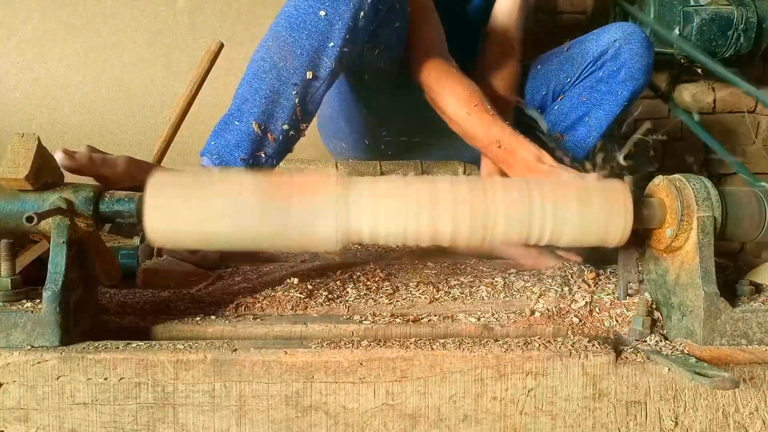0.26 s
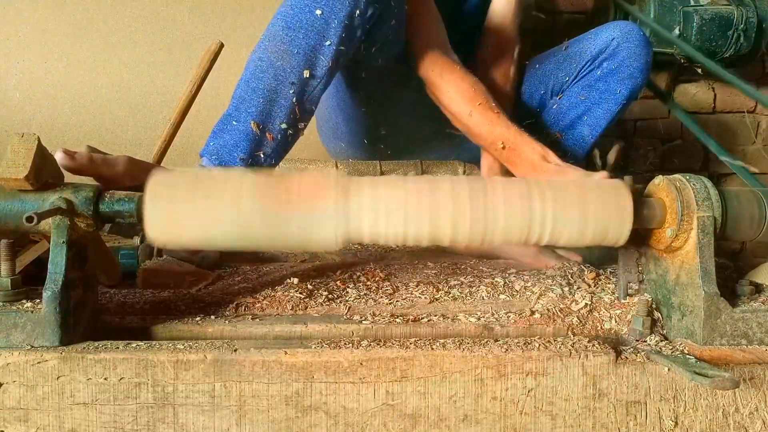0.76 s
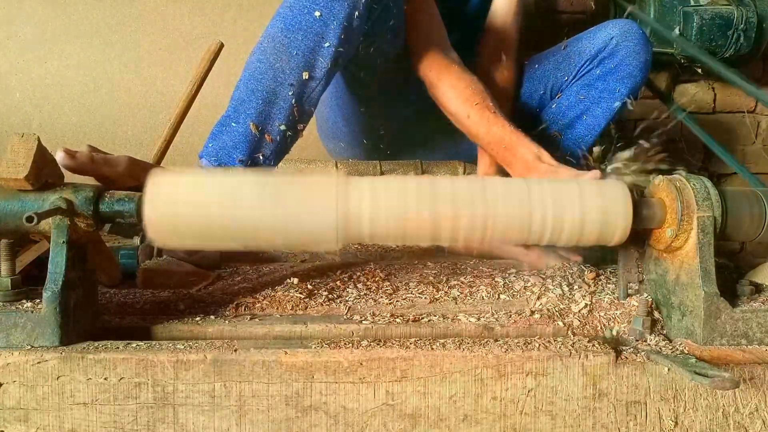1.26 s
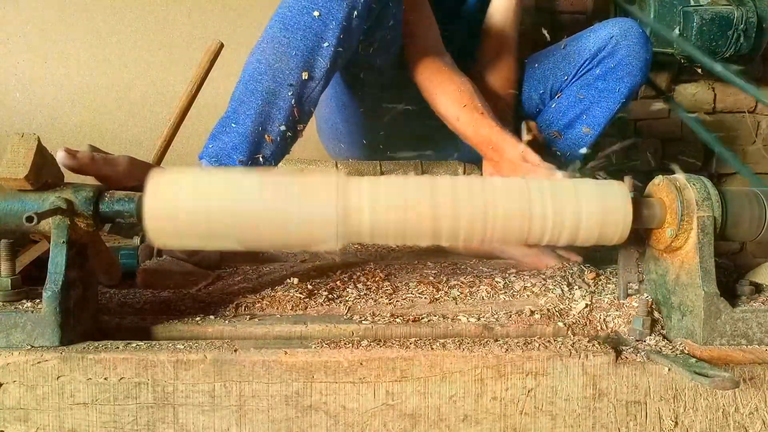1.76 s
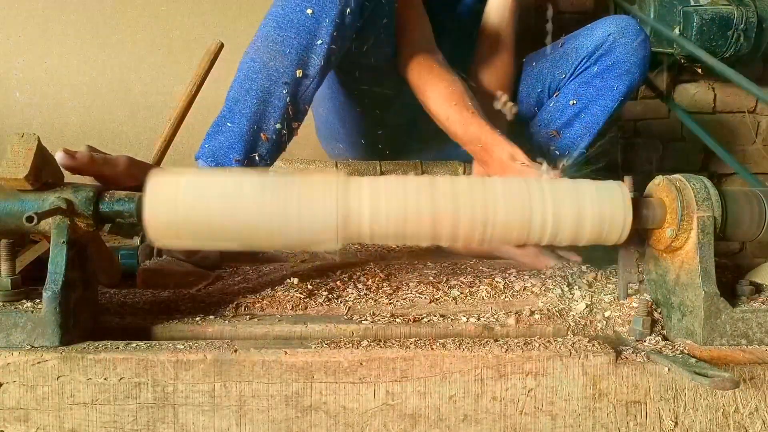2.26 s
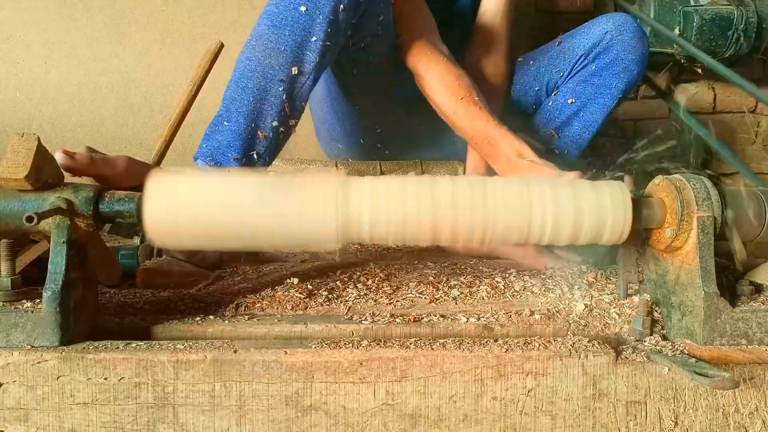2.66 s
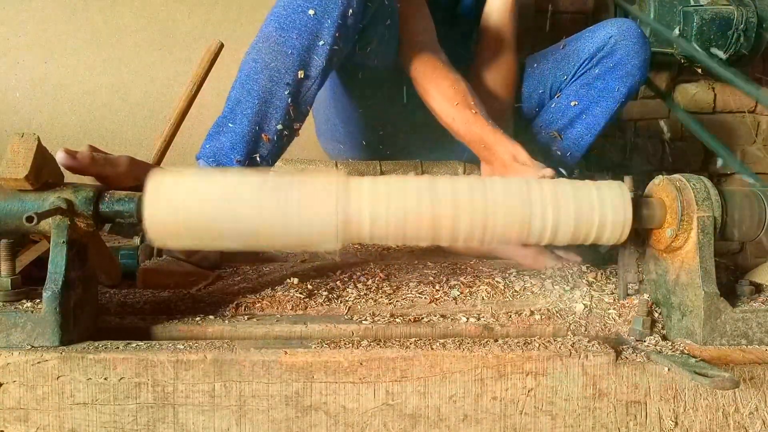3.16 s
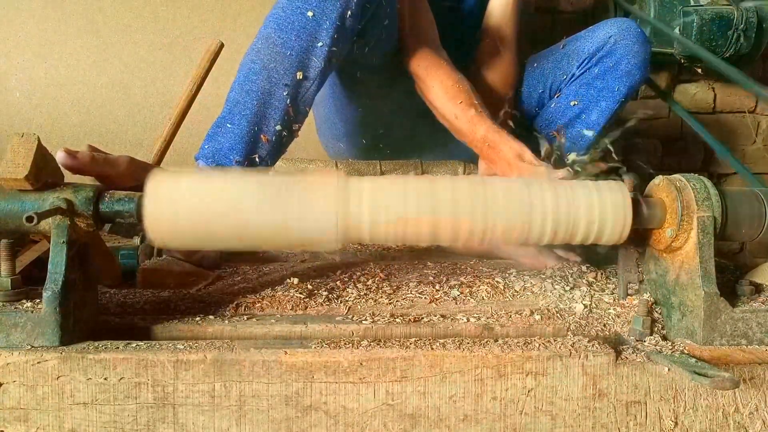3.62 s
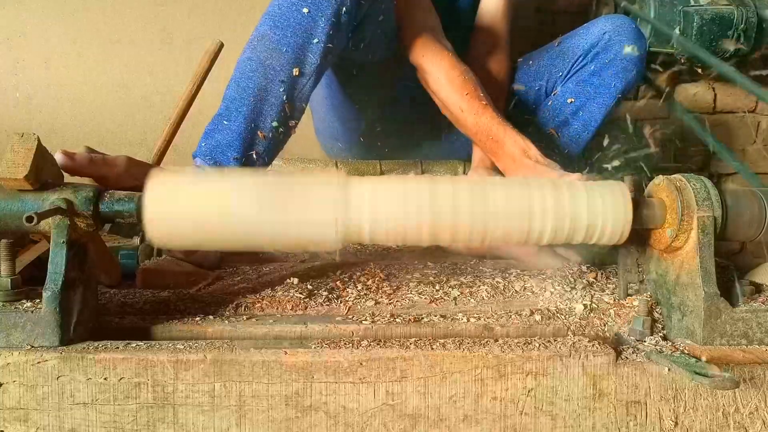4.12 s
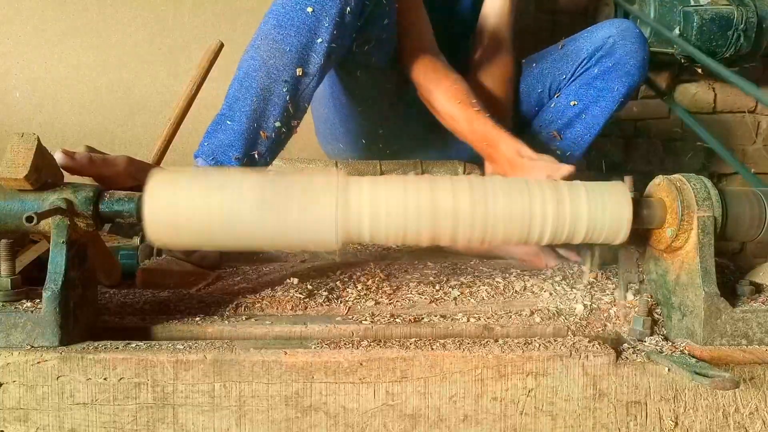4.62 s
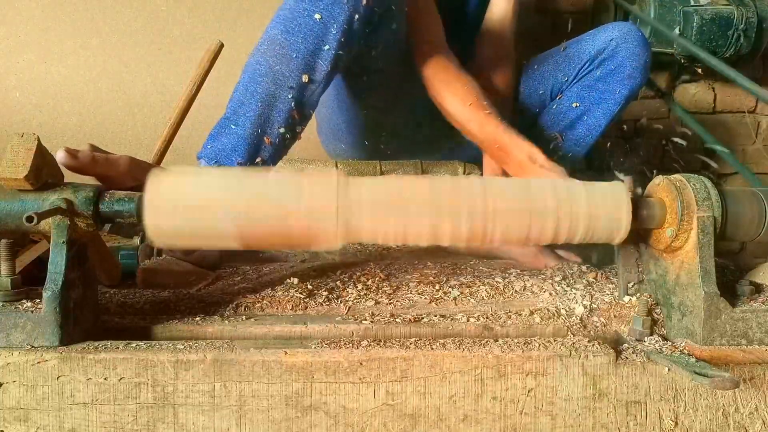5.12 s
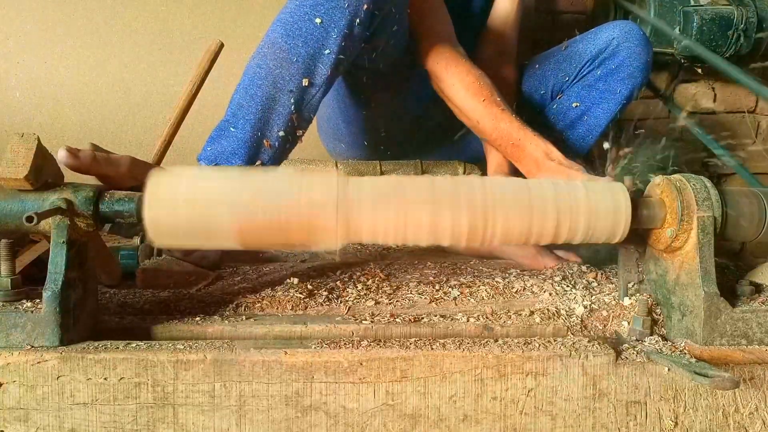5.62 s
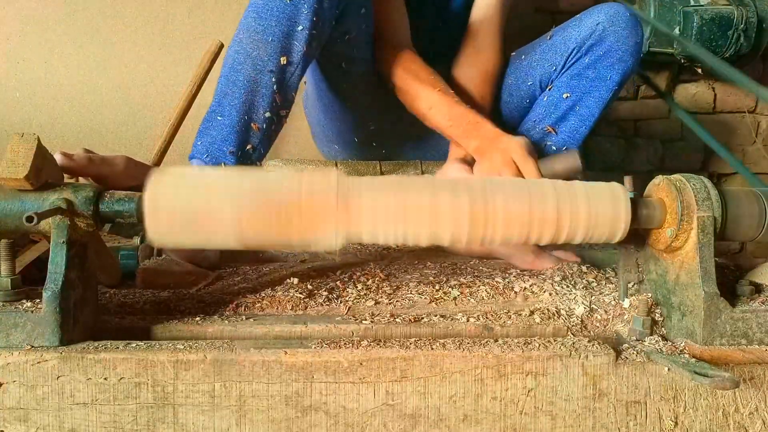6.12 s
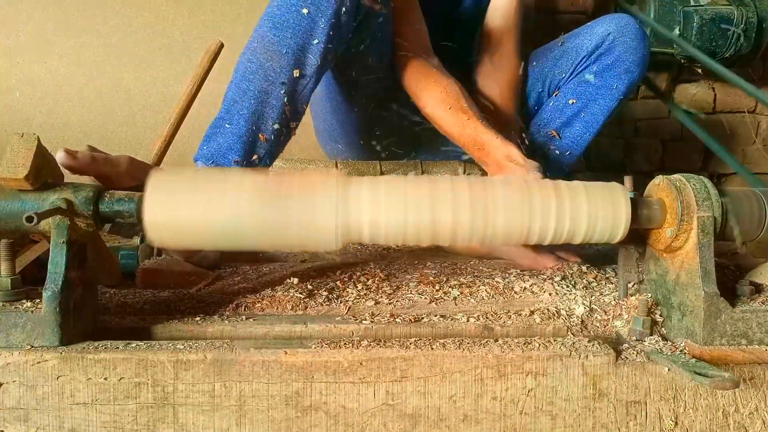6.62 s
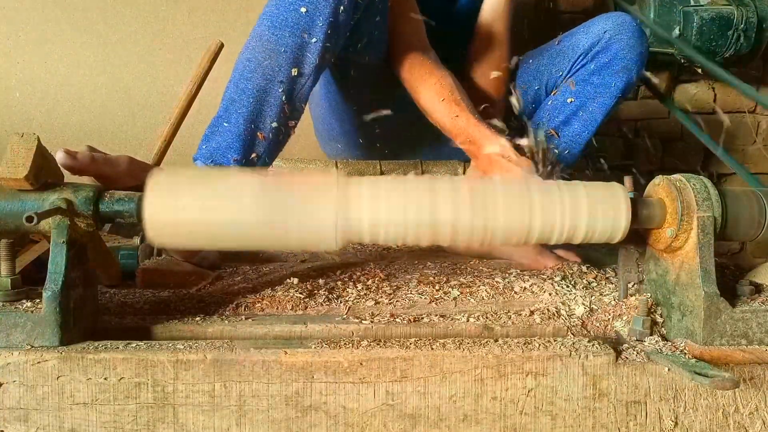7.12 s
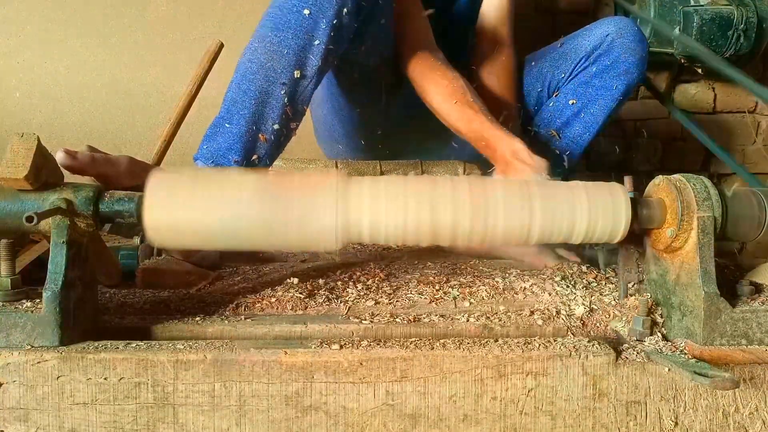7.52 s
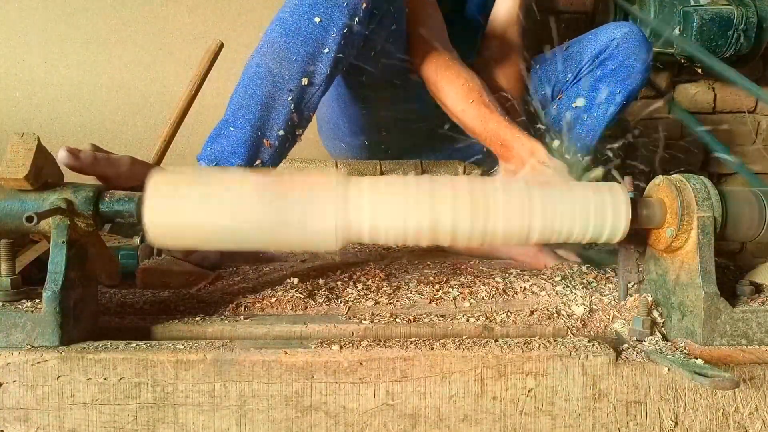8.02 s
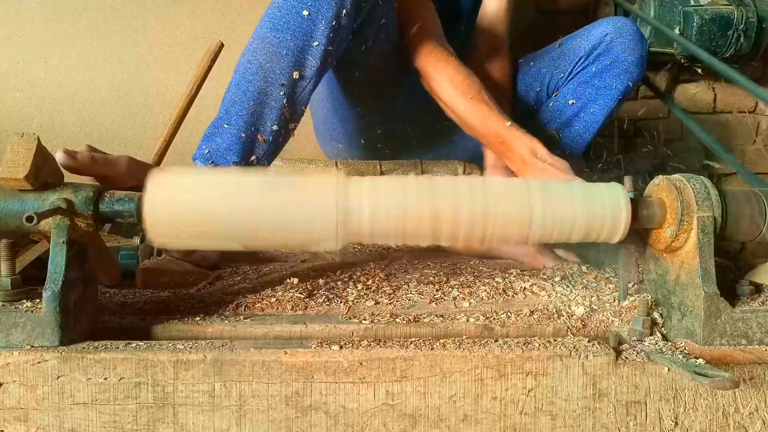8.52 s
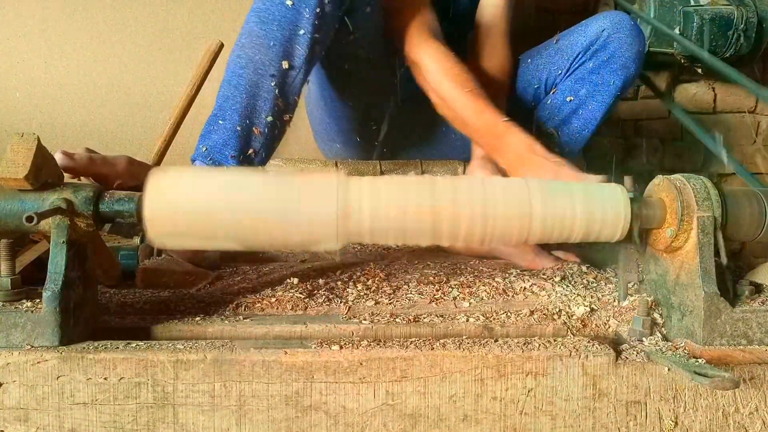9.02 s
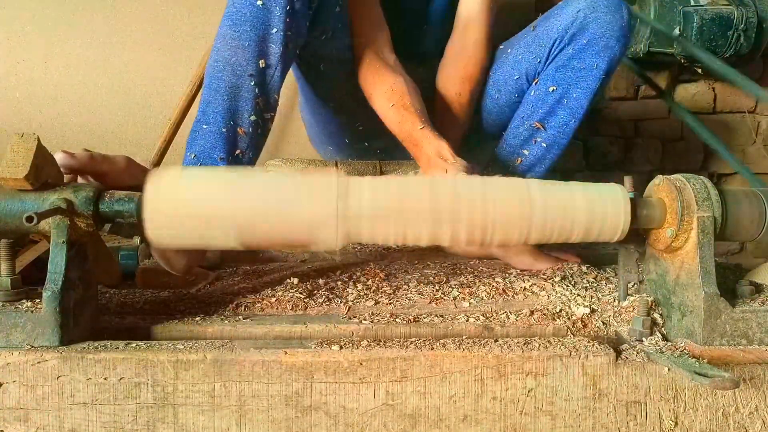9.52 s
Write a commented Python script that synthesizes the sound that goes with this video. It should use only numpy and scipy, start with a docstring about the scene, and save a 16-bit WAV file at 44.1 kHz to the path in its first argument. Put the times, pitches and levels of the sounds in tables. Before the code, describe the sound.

Close up in a small workshop, a belt-driven lathe runs with a steady hum, a faint bearing whine and a light rattle. Over it, a turning tool is pushed again and again into the spinning wood, making gritty, hissing scrapes with a slight metallic ring. The edge snags with sharp cracks, sometimes chatters and tears out chips. Two short lulls interrupt the strokes, the second just before a final squealing cut.

```python
"""Turning wood on a lathe

A hand tool is pushed, stroke after stroke, into a wooden spindle on a belt-driven lathe in a small shop.
Fibres snap at the edge and ring the steel tool, its rest and the wood; now and then the edge catches,
chatters or tears out chips. Underneath run a humming drive, a singing bearing and a light rattle."""
import sys
import numpy as np
from scipy import signal
from scipy.fft import rfft, irfft
from scipy.io import wavfile
from scipy.ndimage import uniform_filter1d

SR = 44100
rng = np.random.default_rng(int(sys.argv[2]) if len(sys.argv) > 2 else 0)


def output_pcm(signal):
    """Save a mono or channel-first signal as 16-bit PCM at the path in sys.argv[1].

    Samples are clipped to [-1, 1] before scaling.
    """
    pcm = np.clip(np.atleast_2d(signal).T, -1, 1) * 32767
    wavfile.write(sys.argv[1], SR, np.round(pcm).astype(np.int16))


N = 430857
TIME = np.arange(N) / SR
TURN_HZ = 16.3   # spindle speed

# Pushes of the tool: start/s, hold/s, fade/s, level/dB, swell over the hold/dB, edge against scrape/dB
STROKES = [ (0.086, 0.29, 0.092, -27.5, 0.5, -4.5), (0.575, 0.29, 0.036, -25, 0, -2),
           (1.139, 0.2, 0.05, -27.5, -4.5, -4), (1.709, 0.27, 0.12, -25, 5, -1.5),
           (2.271, 0.25, 0.18, -26.5, 3.5, -2.5), (2.996, 0.064, 0.11, -29.5, -1.5, 0.5),
           (3.27, 0.11, 0.042, -24.5, -6, -3), (3.557, 0.09, 0.078, -24, 2, -2.5),
           (3.867, .25, 0.13, -26, 2.5, -1.5), (4.217, .31, 0.034, -26.5, 5.5, -2),
           (4.809, .15, 0.034, -28.5, 3.5, 3.5), (5.219, 0.096, 0.021, -28, 7.5, -1),
           (5.58, 0.12, 0.066, -26, -0.5, 2.5), (6.505, 0.015, 0.03, -26.5, 8.5, 7),
           (6.566, 0.27, 0.072, -29, 8.5, 4), (7.048, 0.39, 0.067, -26.5, -1.5, 2.5),
           (7.623, 0.18, 0.044, -33, 1, 1.5), (7.991, 0.44, .07, -26, 0.5, -3.5),
           (8.672, 0.21, 0.078, -26, 6, 2), (9.590, 0.15, 0.045, -26, -0.5, 15), ]
# The edge catches in the wood: t/s, level before the tool's pressure softens it/dB
CATCHES = [(0.159, -13.5), (0.296, -10.5), (0.47, -28), (0.836, -11), (0.973, -21), (1.359, -16.5),
           (1.529, -31.5), (2.073, -17), (2.109, -24), (2.888, -17), (2.947, -16.5), (3.066, -19),
           (3.61, -21), (3.714, -26), (3.875, -11.5), (4.769, -26), (5.113, -17), (5.232, -17),
           (5.483, -18.5), (5.591, -13.5), (5.669, -10), (6.088, -25.5), (6.097, -37), (6.215, -18.5),
           (6.341, -30), (6.747, -15), (6.883, -31), (7.259, -10.5), (7.523, -36), (7.598, -22.5),
           (7.639, -17.5), (7.676, -15), (7.757, -14.5), (8.043, -13), (8.354, -9.5), (9.596, -14),
           (9.665, -18), (9.755, -14.5)]
# The tool chatters on one resonance: start/s, end/s, f/Hz, level against the cut/dB
CHATTERS = [(0.62, 0.78, 2680, -10), (1.207, 1.423, 4445, -6.5), (2.04, 2.136, 4540, 3.5),
            (2.374, 2.68, 4530, -9.5), (3, 3.138, 4650, -10), (5.568, 5.66, 4580, -8),
            (7.154, 7.41, 2756, -6), (8.016, 8.335, 3780, -9.5), (9.6, 9.794, 2423, 1.5)]
# Deep cuts that tear out chips: start/s, end/s, level/dB
TEAR_OUTS = [(0.677, 0.902, -48.5), (1.164, 1.266, -43.5), (1.747, 1.912, -46.5), (2.324, 2.597, -49.5),
             (3.292, 3.416, -43.5), (3.532, 3.71, -51), (3.86, 4.2, -47.5), (4.438, 4.486, -39),
             (6.656, 6.863, -36), (7.735, 7.816, -55), (9.606, 9.796, -44)]
# Ring of tool, rest and wood: f/Hz, width/Hz, level/dB
TOOL_MODES = [(882.5, 44, -10.5), (1147.3, 41.5, 1.5), (1241, 58, -0.5), (1800, 370, -11.5),
              (1991, 160, 3.5), (2346, 116, 3), (2665, 136, 5), (3400, 23, -15.5), (3896, 170, -1),
              (4428, 195, 0.5), (4596, 564, 0.5), (5557, 142, 2), (6310, 360, -9), (8884, 117, -11),
              (11310, 276, -20)]
# Bending of the spindle and its bed: f/Hz, width/Hz, level/dB
SPINDLE_MODES = [(120, 94, -5.5), (211, 78, -2.5), (289, 122, -4.5), (405, 114, -7), (597, 75, 1.5),
                 (685, 410, -5.5)]
# The frame, throbbing with the drive: f/Hz, width/Hz, level/dB
FRAME_MODES = [(106.5, 37, -1.5), (411, 56, 0), (705, 134, -5)]
# Song of the bearing: f/Hz, width/Hz, level/dB
BEARING_MODES = [(1720, 71, -11.5), (1769, 68, -4), (2304, 50, -10), (2590, 200, -14), (11270, 97, -32)]
# Rattle of loose play at the centres: f/Hz, width/Hz, level/dB
RATTLE_MODES = [(2540, 240, -3.5), (2730, 84, -0.5)]
# Tone curve of the chip hiss: f/Hz, level/dB
CHIP_HISS = [(100, 3), (600, 12.5), (1500, -5), (2300, -19), (3600, 28), (4800, -12.5), (6800, 29.5),
             (7900, -72), (9300, 7.5), (12300, -2.5), (14000, 8.5), (15500, 8.5)]
# Tone curve of belt and motor: f/Hz, level/dB
DRIVE_COLOUR = [(25, -8), (70, -4.5), (110, -2), (250, -6.5), (800, -3), (1000, -8.5), (1350, -1.5),
                (2900, -4), (3500, -16), (5800, -14), (8000, -29), (13500, -32.5), (15600, -14.5)]


def cutting(grain, scrape, edge):
    """The cut rings the low modes with its scrape, the high with its edge, and sheds splinters and hiss."""
    strength = np.hypot(scrape, edge)
    freedom = 1 / (1 + strength / from_db(-27.5))   # a tool already pressed into the wood jumps less
    jolts = freedom * catches()
    low_force = from_db(-0.35) * scrape * grain + jolts
    high_force = edge * grain + jolts
    split_hz = 3250
    low = body(low_force, [m for m in TOOL_MODES if m[0] < split_hz], wander_db=4.5, wander_hz=12)
    high = body(high_force, [m for m in TOOL_MODES if m[0] >= split_hz], wander_db=6.5, wander_hz=10.9)
    rings = np.std(low_force) * rms_one(low) + from_db(-3) * np.std(high_force) * rms_one(high)
    cracks = edge * evened(snaps(per_s=450, spread_db=6.5), seconds=0.099)
    crackle = from_db(-9) * splinters(cracks + jolts)
    hiss = from_db(-15.5 + 4.9 * drift(4.5)) * edge * coloured(grain, CHIP_HISS)
    return rings + crackle + hiss + strength * chatter(grain)


def stroke_gains(graze_s=0.02, attack_s=0.0073, settle_s=0.11, high_spot_s=0.012, lift_s=0.016):
    """Envelopes of scrape and edge: the tool grazes, bites, bounces, holds, eases off and lifts."""
    gains = np.zeros((2, N))
    for start, hold_s, fade_s, db, swell_db, edge_db in STROKES:
        age = TIME - start
        since = np.maximum(age, 0)
        graze = from_db(-15) * np.clip(1 + age / graze_s, 0, 1)
        bite = np.clip(age / attack_s, 0, 1)
        lift = np.clip(1 - (age - hold_s - fade_s) / lift_s, 0, 1)
        contact = np.maximum(bite, graze) * lift
        push_db = swell_db * (np.minimum(since / hold_s, 1) - 0.5)
        ease_db = -15 * np.clip((age - hold_s) / fade_s, 0, 1)
        # the wood's high spot knocks the tool once a turn until the cut settles
        bounce_db = 4.5 * np.exp(-since / settle_s) * np.cos(2 * np.pi * TURN_HZ * (since - high_spot_s))
        shares = from_db([[0], [edge_db]])
        gains += shares / np.linalg.norm(shares) * contact * from_db(db + push_db + ease_db + bounce_db)
    return gains


def fibres():
    """Snapping fibres come in clumps: the wood bites twice a turn and the edge skips unevenly."""
    angle = 2 * np.pi * np.cumsum(TURN_HZ * (1 + 0.0078 * drift(1.37))) / SR
    bite_db = 2 * np.sin(angle) + 2 * np.sin(2 * angle) + 5.5 * np.tanh(drift(100))
    return evened(snaps(per_s=4500, spread_db=4) * from_db(bite_db), seconds=0.0755)


def catches(rise_s=0.0018, fall_s=0.004, rub_db=-8, rub_s=0.012):
    """Each catch is a sharp burst of breaking fibres; the edge rubs on briefly as it springs back."""
    envelope = np.zeros(N)
    age = np.arange(-SR // 25, SR // 10) / SR
    burst = np.exp(-np.maximum(-age / rise_s, age / fall_s))
    rub = from_db(rub_db) * np.exp(-np.abs(age) / rub_s) * (age > 0)
    for t, db in CATCHES:
        at = round((t + age[0]) * SR)
        envelope[at:at + len(age)] += from_db(db) * np.maximum(burst, rub)[:N - at]
    return envelope * evened(snaps(per_s=9000, spread_db=2), seconds=0.002)


def splinters(force, low_hz=1995, high_hz=7056, width_hz=220, flicker_db=49):
    """Splinters of every length ring for a moment, each at its own pitch."""
    rings = np.zeros(N)
    for k, hz in enumerate(np.linspace(low_hz, high_hz, 22)):
        db = -4.5 * np.log2(hz / low_hz) + flicker_db * np.tanh(drift(33))
        rings += (-1) ** k * from_db(db) * resonance(force, hz, width_hz)
    return np.std(force) * rms_one(rings)


def chatter(grain):
    """At some angles of the tool one resonance takes over and squeals roughly."""
    squeals = np.zeros(N)
    for start, end, hz, db in CHATTERS:
        squeal = evened(resonance(grain, hz, width_hz=120), seconds=0.069)
        squeals += from_db(db) * during(start, end, fade_s=0.05) * squeal
    return squeals


def tearing(scrape):
    """Coarse chips break away and knock on the spindle: lightly in any cut, hard in the deep ones."""
    deep_cuts = sum(from_db(db) * during(start, end, fade_s=0.051) for start, end, db in TEAR_OUTS)
    depth = np.hypot(deep_cuts, from_db(-28.5) * scrape)
    knocks = body(snaps(per_s=200, spread_db=5), SPINDLE_MODES, wander_db=7, wander_hz=22)
    return depth * evened(knocks, seconds=0.09)


def lathe(tick_hz=35.6, tick_decay_s=0.0025):
    """Belt and motor rush and throb, the bearing sings, and the spindle ticks softly in its centres."""
    drive = coloured(rng.standard_normal(N) * from_db(3.25 * drift(37)), DRIVE_COLOUR)
    throb = rms_one(body(rng.standard_normal(N), FRAME_MODES, wander_db=9.5, wander_hz=12))
    bearing = rms_one(body(rng.standard_normal(N), BEARING_MODES, wander_db=3.5, wander_hz=18))
    tick_count = np.cumsum(tick_hz * (1 + 0.087 * drift(30))) / SR
    age = tick_count % 1 / tick_hz
    ticks = rng.standard_normal(N) * np.exp(-age / tick_decay_s) * from_db(4.2 * np.tanh(drift(66)))
    rattle = rms_one(body(ticks, RATTLE_MODES, wander_db=0.5, wander_hz=15))
    return from_db(-49) * drive + from_db(-56) * throb + from_db(-47) * bearing + from_db(-48.5) * rattle


def workshop(x, t60_s, wet_db, predelay_s):
    """Hard surfaces nearby add a short, dense tail."""
    age = TIME[:SR // 2]
    tail = rng.standard_normal(len(age)) * from_db(-60 * age / t60_s) * (age > predelay_s)
    return x + from_db(wet_db) * signal.oaconvolve(x, tail / np.linalg.norm(tail))[:N]


def body(force, modes, wander_db, wander_hz):
    """Modes in parallel; their balance wanders as the point of contact moves."""
    return sum(resonance(force, hz, width_hz) * from_db(db + wander_db * np.clip(drift(wander_hz), -2, 1.5))
               for hz, width_hz, db in modes)


def resonance(x, hz, width_hz):
    """A band-pass peak of gain 1; a second, wider one steepens its skirts."""
    for width in (width_hz, width_hz * 2.3):
        r = np.exp(-np.pi * width / SR)
        feedback = [1, -2 * r * np.cos(2 * np.pi * hz / SR), r * r]
        x = signal.lfilter(np.array([1, 0, -1]) * (1 - r * r) / 2, feedback, x + 1e-18)
    return x


def coloured(x, colour, size=4096):
    """Minimum-phase EQ along a tone curve; comes out at rms 1."""
    hz, db = np.transpose(colour)
    grid_hz = np.maximum(np.arange(size // 2 + 1) * SR / size, 1)
    gain = from_db(np.interp(np.log(grid_hz), np.log(hz), db))
    cepstrum = irfft(np.log(gain))
    cepstrum[1:size // 2] *= 2
    cepstrum[size // 2 + 1:] = 0
    impulse = irfft(np.exp(rfft(cepstrum)))
    return rms_one(signal.oaconvolve(x, impulse)[:N])


def snaps(per_s, spread_db):
    """Random clicks of uneven size."""
    sizes = from_db(spread_db * np.minimum(rng.exponential(1, N), 4)) * rng.choice([-1, 1], N)
    return rms_one(sizes * (rng.random(N) < per_s / SR))


def drift(hz):
    """Smooth random modulation of rms 1 that changes about hz times a second."""
    hop, run_in = 16, 4000
    r = np.exp(-2 * np.pi * hop * hz / SR)
    slow = signal.lfilter([1], [1, -2 * r, r * r], rng.standard_normal(N // hop + run_in + 2))[run_in:]
    return np.interp(np.arange(N) / hop, np.arange(len(slow)), rms_one(slow))


def evened(x, seconds):
    """A leveller: holds the mean power at 1 and keeps the faster grain."""
    power = uniform_filter1d(x * x, int(seconds * SR))
    return x / np.sqrt(np.maximum(power, 1e-9))


def during(start, end, fade_s):
    """A soft gate, open between two times."""
    return np.clip(np.minimum(TIME - start, end - TIME) / fade_s + 0.5, 0, 1)


def from_db(db):
    return 10 ** (np.asarray(db) / 20)


def rms_one(x):
    return x / np.sqrt(np.mean(x ** 2) + 1e-20)


def scene():
    """Tool and lathe up close, in mono: quick returns off the bench, then the faint ring of the room."""
    scrape, edge = stroke_gains()
    direct = cutting(fibres(), scrape, edge) + tearing(scrape) + lathe()
    near = workshop(direct, t60_s=0.08, wet_db=-11, predelay_s=0.005)
    return workshop(near, t60_s=0.18, wet_db=-16, predelay_s=0.018)[None]


def record(dry):
    """A steep high cut takes off the very top."""
    cutoff_hz = 15900
    return signal.sosfilt(signal.ellip(12, 0.2, 80, cutoff_hz, fs=SR, output="sos"), dry)


dry = scene()
out = record(dry)
output_pcm(out)
```